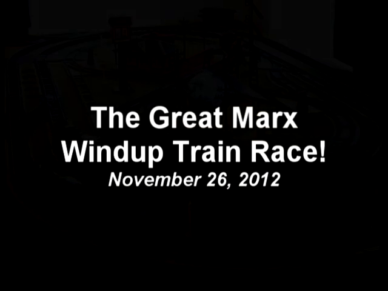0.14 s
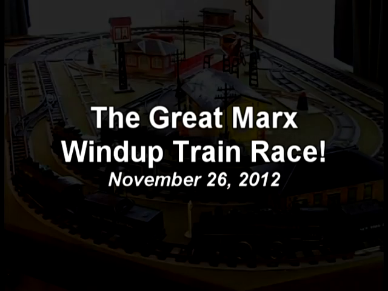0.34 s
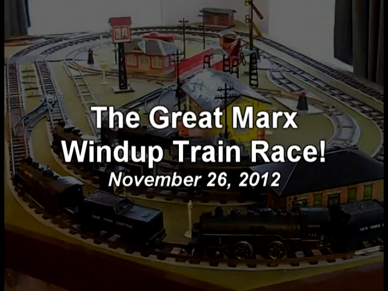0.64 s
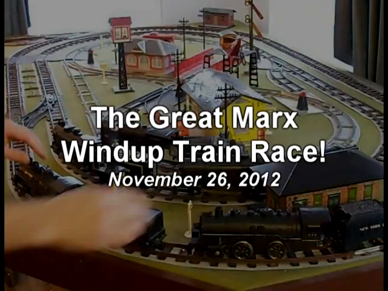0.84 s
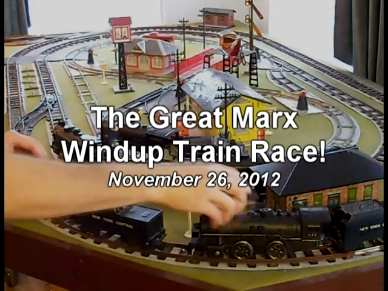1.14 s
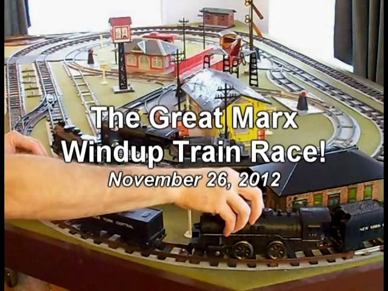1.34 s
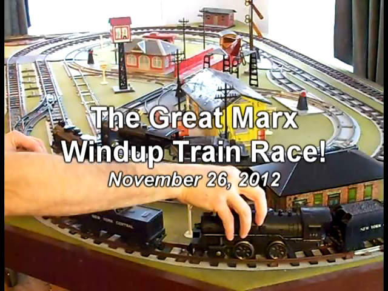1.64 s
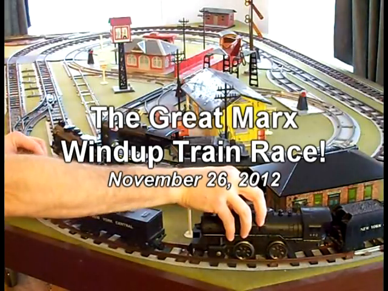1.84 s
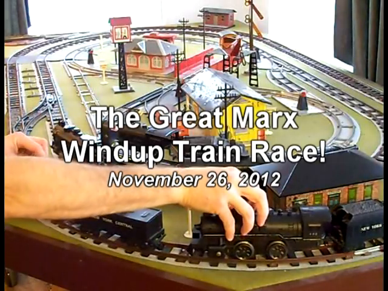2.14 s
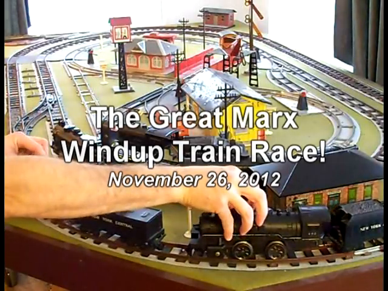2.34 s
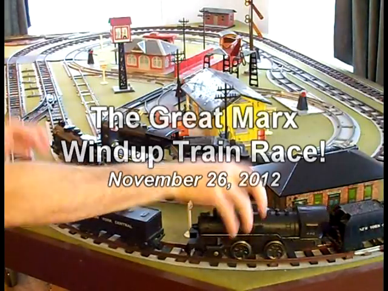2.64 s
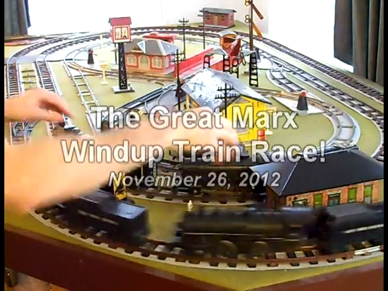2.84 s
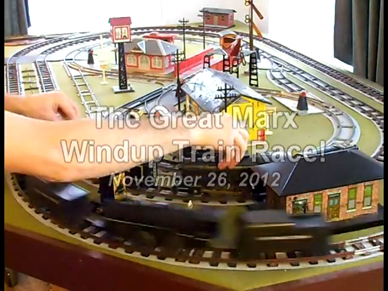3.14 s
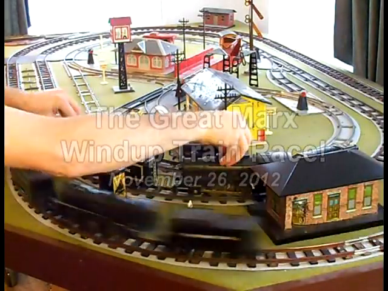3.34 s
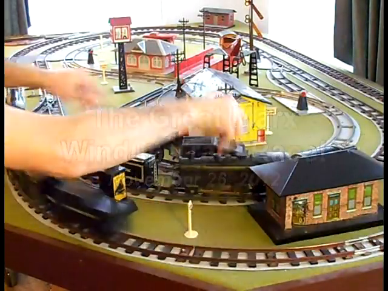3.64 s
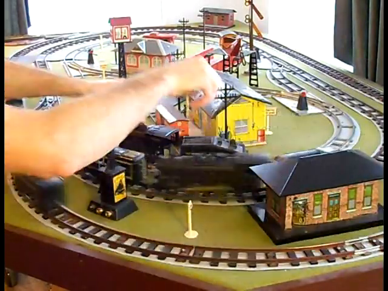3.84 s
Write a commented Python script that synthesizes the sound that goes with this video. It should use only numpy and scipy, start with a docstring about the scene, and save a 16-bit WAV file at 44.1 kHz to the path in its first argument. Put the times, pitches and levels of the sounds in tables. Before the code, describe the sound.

Wind-up toy trains are clicked by hand, then released into a fast metallic rattle and whirr

```python
"""Tin locomotives on a tabletop track

Place: a small room with steady hiss, rumble and a low drone. Wind-up locomotives scrape and click under the
hand, then are let go. Motor teeth and loose tin tick faster as they gather speed, all ringing the tin bodies.
Couplings clank, resonances of the table top rumble, tin and track drone, and wheel flanges squeal.
Distance: the room's ring lies just under the tin's own. Early in the run the level dips briefly and a thin
squeal is left. Microphone: a small one that rounds the peaks, after a gain control."""
import sys
import numpy as np
from scipy import signal
from scipy.fft import rfft, irfft
from scipy.io import wavfile
from scipy.ndimage import uniform_filter1d

SR = 44100
rng = np.random.default_rng(int(sys.argv[2]) if len(sys.argv) > 2 else 0)


def bounce(signal):
    """Save signal as a 16-bit WAV file at the path given by the first command-line argument."""
    frames = np.transpose(np.atleast_2d(signal))
    limited = np.clip(frames, -1, 1)
    pcm = np.round(limited * 32767).astype(np.int16)
    wavfile.write(sys.argv[1], SR, pcm)


N = 176400  # 4 s
DRAWS = 4096  # random values drawn for each slow wander or stream of clicks


def undb(db):
    """Amplitude factor of a level in dB."""
    return 10 ** (np.asarray(db) / 20)


def unit(x):
    """Scale to rms 1."""
    return x / np.sqrt(np.mean(x ** 2))


def peak(x):
    """Scale to peak 1."""
    return x / np.abs(x).max()


def clock():
    """Time of every sample in s."""
    return np.arange(N) / SR


def curve(rows):
    """Gain along (time [s], level [dB]) points."""
    times, levels_db = np.array(rows).T
    return undb(np.interp(clock(), times, levels_db))


def add(out, s, x):
    """Mix x in at time s."""
    i = int(s * SR)
    out[i:i + len(x)] += x[:N - i]


def band(x, hz, width_hz):
    """One resonance, gain 1 at the centre."""
    b, a = signal.iirpeak(hz, hz / width_hz, SR)
    return signal.lfilter(b, a, x)


def resonate(x, modes):
    """Sum of resonances given as (frequency [Hz], width [Hz], level [dB])."""
    return sum(undb(db) * band(x, hz, width_hz) for hz, width_hz, db in modes)


def colour(x, points):
    """Causal (minimum-phase) filter through (frequency [Hz], gain [dB]) points."""
    size = 8192
    hz, db = np.array(points).T
    f = np.maximum(np.fft.rfftfreq(size, 1 / SR), 1)
    gain = undb(np.interp(np.log(f), np.log(hz), db))
    # folding the cepstrum onto positive time makes the response causal
    cepstrum = irfft(np.log(gain))
    cepstrum[1:size // 2] *= 2
    cepstrum[size // 2 + 1:] = 0
    response = irfft(np.exp(rfft(cepstrum)))
    return signal.fftconvolve(x, response)[:len(x)]


def walk(rate_hz):
    """Random wander, a new target rate_hz times a second, spread near 1."""
    return np.interp(clock() * rate_hz, np.arange(DRAWS), rng.standard_normal(DRAWS))


CRACK_DB, CRACK_T60_S = -3.5, 0.0055  # dry tick at the start of every blow
ROOM_DB, ROOM_T60_S = -4, 0.34


def ring(t60_s):
    """One blow on sheet tin: a dry tick, crowded short modes, then the room, all as fading noise."""
    t = clock()[:SR // 2]

    def fade(fade_t60_s):
        return unit(rng.standard_normal(len(t)) * undb(-60 * t / fade_t60_s))

    tick = undb(CRACK_DB) * fade(CRACK_T60_S)
    room = undb(ROOM_DB) * fade(ROOM_T60_S)
    return tick + fade(t60_s) + room


HUM_WANDER, HUM_FLUTTER_DB = 0.026, 2.5  # pitch wander (fraction), level wander


def drone(hz):
    """A low tone that wavers in pitch and level."""
    turn = 2 * np.pi * np.cumsum(hz * (1 + HUM_WANDER * walk(25))) / SR
    return unit(np.sin(turn) * undb(HUM_FLUTTER_DB * walk(16)))


# spectrum of the steady air in the room: (frequency [Hz], gain [dB])
ROOM_AIR = [(12, -32), (20, 0.5), (64, -8), (95, -4.5), (120, -6), (160, -5.5), (237, -7.5), (368, -8.5),
            (762, -13.5), (4830, -29.5), (6770, -42), (10000, -62), (13000, -100), (22000, -120)]
AIR_DB = -42
# low drone of the room: (time [s], level [dB])
ROOM_HUM = [(0, -71), (.45, -52.5), (1.55, -49), (1.9, -60), (4, -51)]
ROOM_HUM_HZ = 95


def room_tone():
    """Steady hiss and rumble from coloured noise, with a low wavering drone."""
    air = unit(colour(rng.standard_normal(N), ROOM_AIR))
    return undb(AIR_DB) * air + drone(ROOM_HUM_HZ) * curve(ROOM_HUM)


# touches of the hand on a locomotive:
# (time [s], peak level [dB], fading time of the scrape [s], peak level of the table thump [dB])
TOUCHES = [(1.447, -31, 0.0086, -57), (1.469, -40, 0.028, -61), (1.503, -36, 0.023, -55),
           (1.807, -21, 0.0065, -45), (1.812, -19.5, 0.011, -38), (1.826, -25.5, .01, -29),
           (2.036, -36, .012, -60), (2.0443, -23, 0.012, -35), (2.0497, -20, 0.026, -39.5),
           (2.0723, -19.5, 0.015, -55), (2.098, -27.5, 0.032, -63), (2.145, -35, 0.016, -40),
           (2.3494, -36, 0.01, -52), (2.7155, -35, 0.014, -58)]
# tone of a touch: (frequency [Hz], gain [dB])
TOUCH_COLOUR = [(88, -31.5), (150, -1.5), (539, -4.5), (1340, -7), (2440, -5.5), (3080, -7.5), (3430, -8.5),
                (4800, -13), (5840, -22), (7360, -28), (10500, -45), (13600, -91), (22000, -120)]
# resonances of the touched tin: (frequency [Hz], width [Hz], level [dB])
TOUCH_MODES = [(574, 22, 6), (1170, 72, 0), (1950, 67, -8), (2340, 110, -1), (2530, 110, -1.5),
               (3080, 120, -10), (4800, 110, -11)]
# table top knocked from above: (frequency [Hz], width of each of two passes [Hz], level [dB])
TABLE_THUMP = [(71, 15.4, -1), (252, 45, -6)]
TOUCH_T60_S = 0.031
CONTACTS_PER_S, CONTACT_DB = 600, -5  # contacts of a scrape, level against the first click


def handling(count=64):
    """Each touch rings the tin with a click and a fading run of small contacts, and thumps the table."""
    out = np.zeros(N)
    for s, db, scrape_s, thump_db in TOUCHES:
        push = signal.unit_impulse(SR // 2)
        after = np.cumsum(rng.exponential(size=count)) / CONTACTS_PER_S
        places = np.minimum(after * SR, len(push) - 1).astype(int)
        sizes = undb(CONTACT_DB) * np.exp(-after / scrape_s) * rng.choice([-1, 1], count)
        contacts = push.copy()
        np.add.at(contacts, places, sizes)
        blow = signal.fftconvolve(contacts, ring(TOUCH_T60_S))
        click = colour(blow + resonate(blow, TOUCH_MODES), TOUCH_COLOUR)
        add(out, s, undb(db) * peak(click))
        # passing each resonance twice softens its onset
        thump = sum(undb(mode_db) * band(band(push, hz, width_hz), hz, width_hz)
                    for hz, width_hz, mode_db in TABLE_THUMP)
        add(out, s, undb(thump_db) * peak(thump))
    return out


TIN_T60_S = 0.036


def shake(clicks):
    """A stream of clicks rings one tin part."""
    return unit(signal.fftconvolve(clicks, ring(TIN_T60_S))[:N])


def strikes(phase, marks, size_db):
    """A click each time the phase passes a mark."""
    out = np.zeros(N)
    at = np.searchsorted(phase, marks)
    np.add.at(out, at[at < N], undb(size_db)[at < N])
    return out


# effort of the running trains: (time [s], level [dB])
TRAIN_EFFORT = [(1.9, -68), (2.2, -46.5), (2.785, -44), (2.8, -32), (2.84, -34.5), (2.885, -29.5),
                (2.935, -30.5), (2.95, -28), (3.01, -30.5), (3.06, -23), (3.185, -24.5), (3.2, -30),
                (3.225, -22), (3.345, -19), (3.385, -24), (3.42, -20), (3.75, -18.5), (4.0, -19.5)]
# spring motors at full speed: (gear teeth per second [1/s], level [dB])
SPRING_MOTORS = [(325.3, -8), (236.7, -7.5)]
# ring of bodies and track, also heard in the clanks: (frequency [Hz], gain [dB])
TIN_COLOUR = [(59, -35), (100, -12.5), (160, -10), (211, -10.5), (300, -8.5), (480, -5), (1050, -4.5),
              (1230, -2.5), (1330, -4.5), (2450, -5.5), (5260, -14), (7340, -27.5), (10900, -52.5),
              (14100, -85), (22000, -120)]
# strongest resonances of the tin: (frequency [Hz], width [Hz], level [dB])
TIN_MODES = [(329, 20, -6.5), (385, 20, -1), (495, 19, -0.5), (931, 11, -1), (1005, 18, -3.5),
             (1227, 23, -6), (1587, 18, -6.5), (1777, 19, -4.5), (1958, 35, -5.5), (2400, 11, -14),
             (2516, 30, -8), (4520, 77, -3.5)]
# treble of the running trains: (time [s], level [dB])
TRAIN_TREBLE = [(2.2, -7), (2.75, -11), (2.84, -9.5), (2.92, -6), (2.97, 3), (3.06, -2), (3.3, 1.5),
                (4.0, -0.5)]
TREBLE_HZ = 2600
RELEASE_S, SPIN_UP_S = 2.79, .22
TOOTH_JITTER, TOOTH_SCATTER_DB = .07, 3.5  # jitter in tooth spacings
WHEEL_HZ, WHEEL_SWING_DB = 7.9, -1  # wheel turns per second at full speed, swing of the tooth level
RATTLES_PER_S, RATTLE_SCATTER_DB, RATTLE_DB = 140, 4.0, -1.5  # rate of each part at full speed
ROLL_DB = -13


def trains(count=10):
    """Gear teeth tick and loose parts chatter faster as the trains gather speed; the wheels roll beneath."""
    since_release = np.maximum(clock() - RELEASE_S, 0)
    speed = 1 - .6 * np.exp(-since_release / SPIN_UP_S)
    out = undb(ROLL_DB) * rng.standard_normal(N)  # rolling wheels
    for tooth_hz, db in SPRING_MOTORS:
        travel = np.cumsum(speed * (1 + .015 * walk(9))) / SR
        late, size = rng.standard_normal((2, DRAWS))
        marks = np.arange(DRAWS) + 1 + TOOTH_JITTER * late
        teeth = strikes(travel * tooth_hz, marks, TOOTH_SCATTER_DB * size)
        wheel_swing = undb(WHEEL_SWING_DB * np.sin(2 * np.pi * WHEEL_HZ * travel))
        out += undb(db) * shake(teeth * wheel_swing)
    for part in range(count):
        gaps, size = rng.exponential(size=DRAWS), rng.standard_normal(DRAWS)
        phase = np.cumsum(speed) / SR * RATTLES_PER_S
        chatter = strikes(phase, np.cumsum(gaps), RATTLE_SCATTER_DB * size)
        out += undb(RATTLE_DB) / np.sqrt(count) * shake(chatter * undb(2.5 * walk(30)))
    out = colour(out + resonate(out, TIN_MODES), TIN_COLOUR)
    dull = signal.sosfiltfilt(signal.butter(2, TREBLE_HZ, fs=SR, output="sos"), out)
    out = dull + (out - dull) * curve(TRAIN_TREBLE)
    return out / np.std(out[clock() > RELEASE_S]) * curve(TRAIN_EFFORT)


# table top shaken by the wheels: (frequency [Hz], width [Hz], level [dB])
TABLE_MODES = [(61.6, 8.2, 2), (80.9, 6.3, -1.5), (119.5, 9.9, -9), (193, 16, -8.5), (248.7, 19, -3)]
# boom of the table top: (time [s], level [dB])
TABLE_RUMBLE = [(2.3, -72), (2.7, -46.5), (2.88, -43.5), (3.2, -44.5), (3.45, -34), (3.7, -28.5),
                (4.0, -27)]
# the track drones under a nearing train: (time [s], level [dB])
TRACK_DRONE = [(2.6, -87.5), (3.2, -49), (3.6, -42.5), (3.74, -30.5), (3.85, -36), (3.96, -23)]
# a tin body hums as its train pulls away: (time [s], level [dB])
BODY_DRONE = [(2.7, -85), (3.04, -36.5), (3.19, -49), (3.25, -27), (3.31, -44), (3.9, -50)]
TRACK_HUM_HZ, BODY_HUM_HZ = 217, 380.8


def table():
    """The rolling wheels, as noise, make the table top boom; the track and a tin body drone."""
    boom = resonate(rng.standard_normal(N), TABLE_MODES)
    boom = signal.sosfilt(signal.butter(2, [40, 350], "bandpass", fs=SR, output="sos"), boom)
    rumble = unit(boom) * curve(TABLE_RUMBLE)
    track = drone(TRACK_HUM_HZ) * curve(TRACK_DRONE)
    body = drone(BODY_HUM_HZ) * curve(BODY_DRONE)
    return rumble + track + body


# wheel flanges squealing on the rail, and a thin squeak ringing through the brief dip near 3.1 s: # (middle
# [s], half length [s], pitch [Hz], level [dB], overtone pitch [Hz], overtone depth below the first tone [dB])
SQUEAL_TONES = [(2.744, 0.0054, 2300, -40, 4600, 20), (2.964, 0.0092, 4740, -37, 7400, 13),
                (2.993, .025, 5000, -36.5, 7080, 11), (3.1132, 0.0024, 2540, -25.5, 5450, 14),
                (3.11, 0.012, 2690, -34, 4580, 4), (3.134, 0.0088, 2760, -39.5, 4640, 3),
                (3.385, 0.022, 5030, -35, 7100, 11), (3.802, .008, 4580, -24.5, 7370, 17),
                (3.82, 0.018, 4600, -31, 7400, 15)]
SQUEAL_WAVER = .012  # fraction of the pitch


def squeals():
    """Short unsteady tones, each with an overtone, that swell and fade."""
    out = np.zeros(N)
    for s, half_s, hz, db, over_hz, below_db in SQUEAL_TONES:
        turn = 2 * np.pi * np.cumsum(1 + SQUEAL_WAVER * walk(700)) / SR
        swell = undb(db + 3.7 * walk(300)) * np.exp(-((clock() - s) / half_s) ** 2)
        overtone = undb(-below_db) * np.sin(over_hz * turn)
        out += swell * (np.sin(hz * turn) + overtone)
    return out


# couplings and rail joints: (time [s], peak level [dB])
CLANK_BLOWS = [(2.795, -33), (2.856, -27), (2.9425, -22), (2.975, -21), (3.0218, -17), (3.0916, -14.5),
               (3.1131, -7.5), (3.162, -16), (3.2128, -17), (3.2752, -11), (3.3214, -12), (3.4218, -10),
               (3.4483, -17), (3.545, -14), (3.6483, -15), (3.7088, -15), (3.847, -12)]
CLANK_T60_S = 0.043


def clanks():
    """Couplings snatch and wheels hit rail joints, each a blow that rings the tin."""
    out = np.zeros(N)
    for s, db in CLANK_BLOWS:
        add(out, s, undb(db) * peak(colour(ring(CLANK_T60_S), TIN_COLOUR)))
    return out


DIP_S, DIP_END_S, DIP_DB = 3.099, 3.161, -19.5


def dip():
    """Gain of the brief dip in level, its edges smoothed."""
    inside = (clock() > DIP_S) & (clock() < DIP_END_S)
    return uniform_filter1d(undb(DIP_DB * inside), size=64)


def scene():
    """Mix the layers; the table dips half as far in dB, the squeals and the room not at all."""
    dipped = (trains() + clanks() + handling()) * dip()
    mix = dipped + table() * np.sqrt(dip()) + squeals() + room_tone()
    return mix[None]


LIMIT_DB, LIMIT_S, LIMIT_SLOPE = -20.5, 0.027, 0.49  # threshold, averaging time, share of the excess removed
CEILING = 0.5  # amplitude where the microphone's peaks round off
NOTCH_HZ, NOTCH_WIDTH_HZ, NOTCH_DEPTH = 6000, 440, 0.85  # depth as the fraction removed at the centre
ROLL_OFF_HZ, TOP_HZ = 8300, 10600


def record(dry):
    """Gain control evens the loud run; the small microphone rounds peaks, hollows the treble, cuts the top."""
    power = uniform_filter1d(dry ** 2, size=int(LIMIT_S * SR))
    excess = np.maximum(power / undb(LIMIT_DB) ** 2, 1)
    x = dry * excess ** (-LIMIT_SLOPE / 2)
    fade_out = np.minimum(np.arange(N)[::-1] / 64, 1)  # last 64 samples
    x = CEILING * np.tanh(x / CEILING) * fade_out
    x = x - NOTCH_DEPTH * band(x, NOTCH_HZ, NOTCH_WIDTH_HZ)
    x = signal.sosfilt(signal.butter(4, ROLL_OFF_HZ, fs=SR, output="sos"), x)
    return signal.sosfilt(signal.ellip(8, .2, 80, TOP_HZ, fs=SR, output="sos"), x)


dry = scene()
out = record(dry)
bounce(out)
```